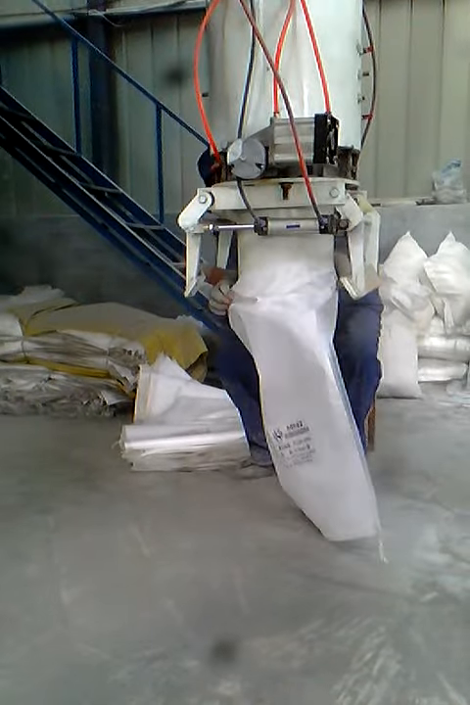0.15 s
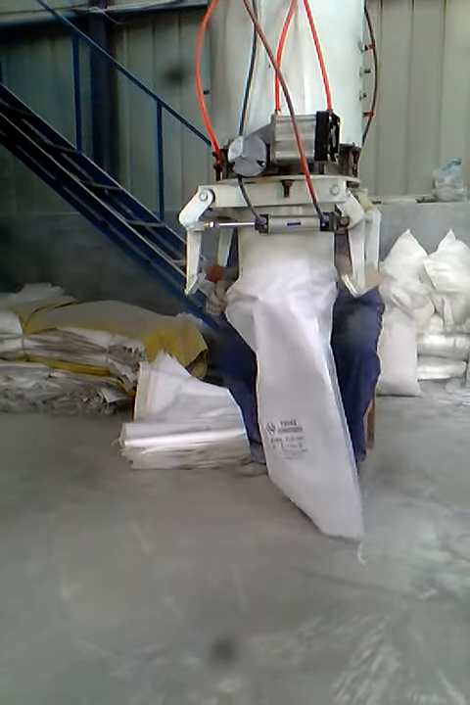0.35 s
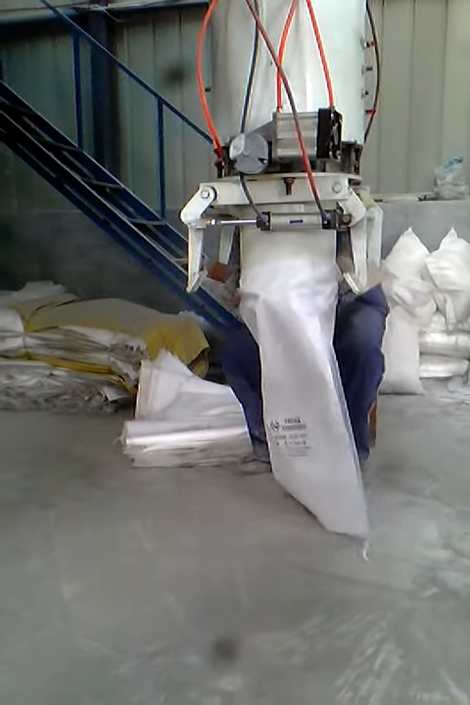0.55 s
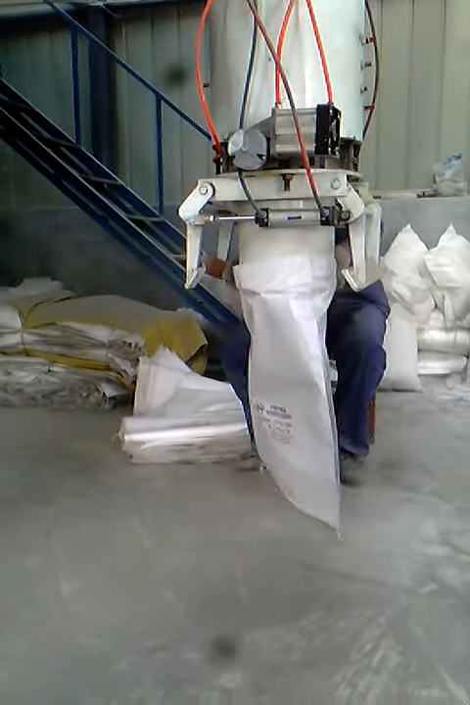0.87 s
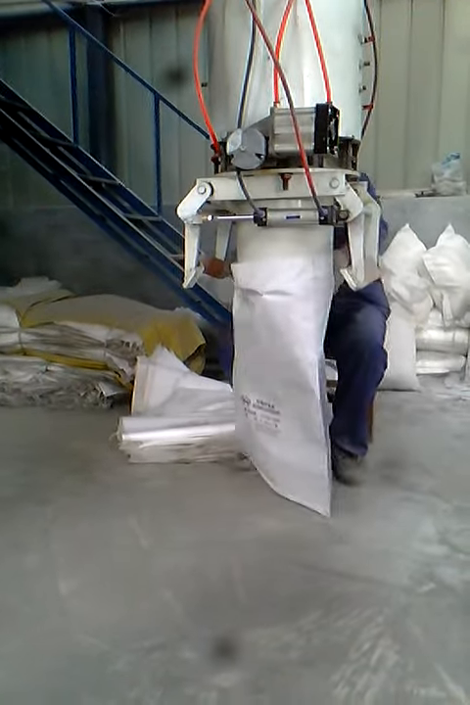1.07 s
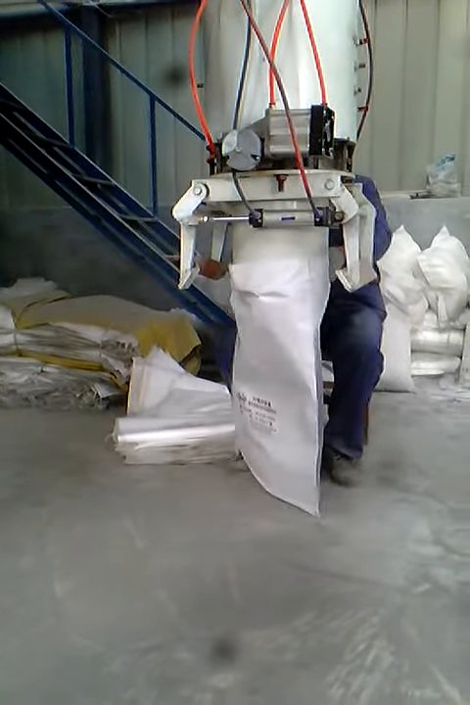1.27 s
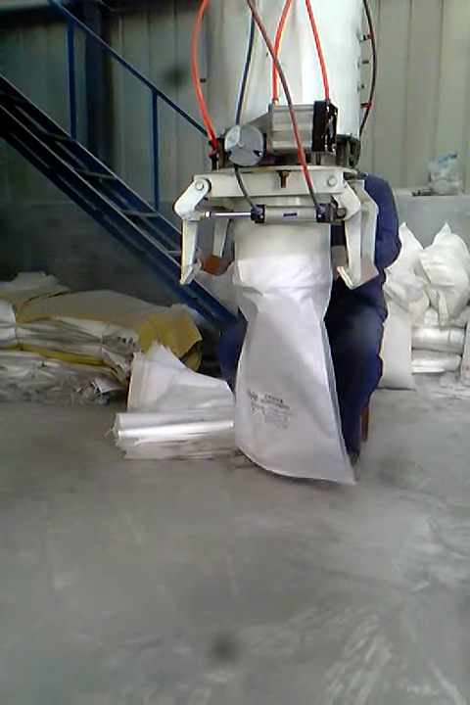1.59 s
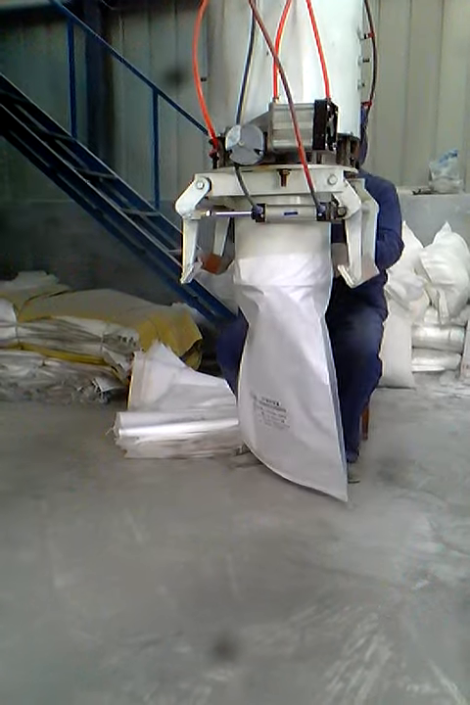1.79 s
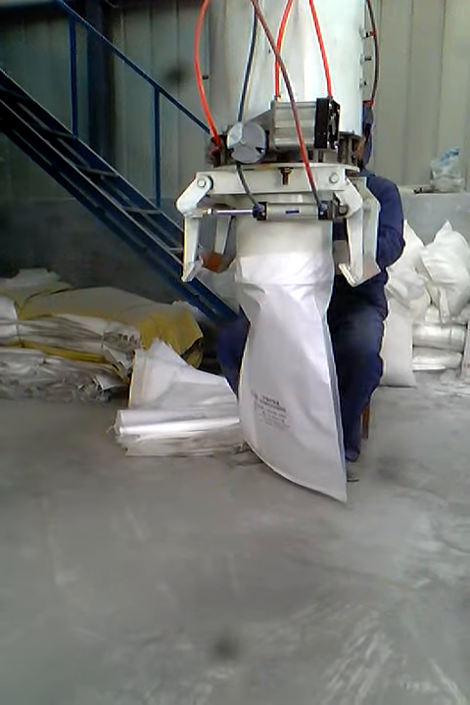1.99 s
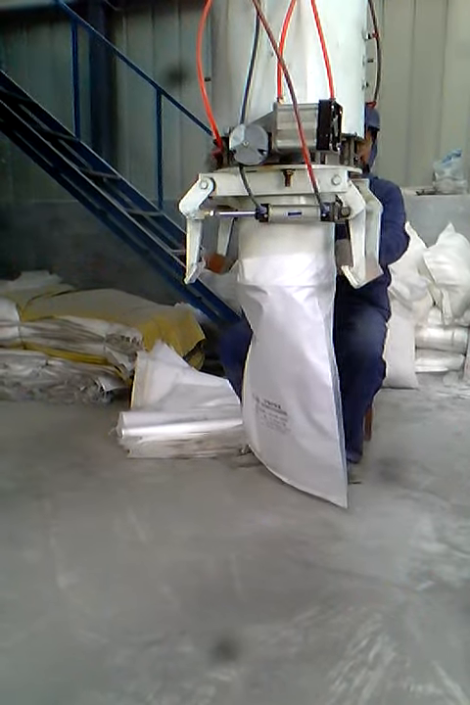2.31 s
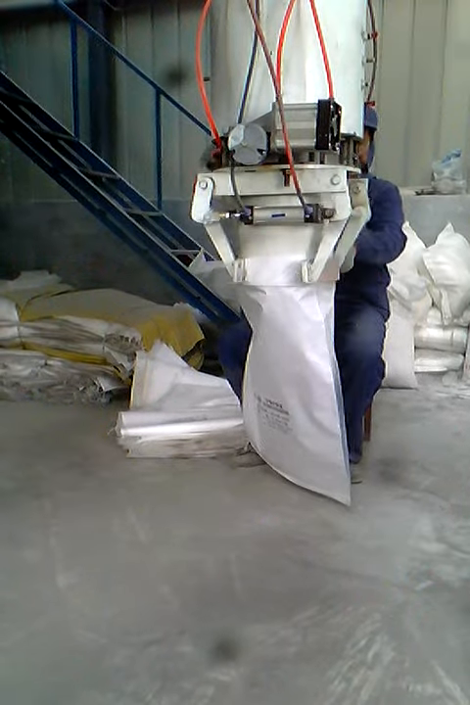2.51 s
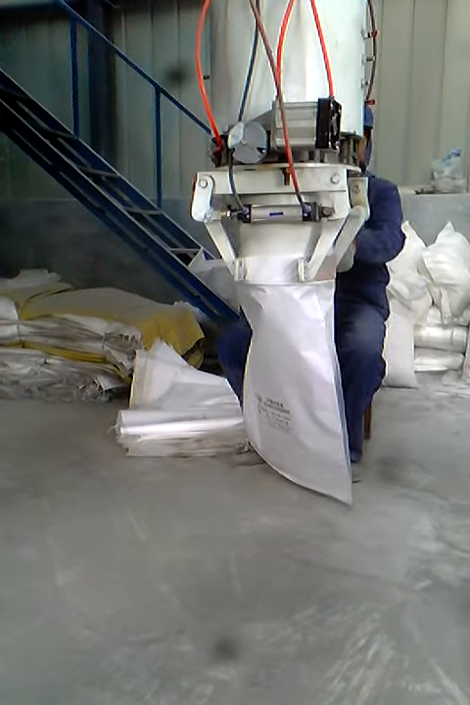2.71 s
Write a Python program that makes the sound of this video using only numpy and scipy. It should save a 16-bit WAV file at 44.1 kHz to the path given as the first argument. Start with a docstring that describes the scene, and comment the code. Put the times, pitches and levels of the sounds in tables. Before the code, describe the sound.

A pneumatic bag clamp closes at about 2.5 s. First, a packing machine idles quietly with steady rush, rapid knocking and ticking, about twenty cycles a second, and faint whining chirps. A woven plastic sack rustles and bumps at 0-0.4 s, softly again near 0.8, 1.7 and 2.15. A valve clacks at 2.3, air swells and bursts at 2.49 with clattering steel slam, hollow boom and short hall tail; squeaks, thin hiss and rustling follow until the end.

```python
"""A drive knocks and ticks about twenty times a second over a steady rush: a bag packing machine idles in a factory hall.
A woven plastic sack, made of grainy noise, rustles and bumps as it is pulled over the spout.
A valve clacks in ringing noise bands, compressed air bursts out as shaped noise, and clamp arms slam on the spout:
blows ring steel modes, with a short hall tail. The spout booms in sagging tones; the pivots squeak in rough tones.
All sources lie straight ahead, as on one microphone feeding both channels; no distances are set."""
import sys
import numpy as np
from scipy import signal
from scipy.fft import rfft, irfft
from scipy.io import wavfile

SR = 44100
rng = np.random.default_rng(int(sys.argv[2]) if len(sys.argv) > 2 else 0)


def store_pcm(level_fs):
    """Save levels as 16-bit WAV."""
    pcm = np.round(np.clip(level_fs, -1, 1) * 32767).astype(np.int16)
    wavfile.write(sys.argv[1], SR, np.atleast_2d(pcm).T)


N = 125685
T = np.arange(N) / SR  # time axis in seconds

# steady rush of the machinery: spectrum (f/Hz, relative level/dB)
RUSH_COLOUR = [(30, -33), (80, -22), (130, -7), (300, -2.5), (420, -6), (680, -6.5), (1000, 2), (1380, -6),
               (1560, -4.5), (2050, -1.5), (2900, -8.5), (6000, -12), (7200, -26.5)]
# strength of the rush over time (t/s, level/dB)
RUSH_LEVEL = [(0, -51), (.4, -52.5), (1.1, -52), (1.7, -53), (1.95, -55.5), (2.85, -53)]
# housing resonances that whine (f/Hz, width/Hz, level/dB)
WHINES = [(320, 21.6, -66), (1045, 17, -65), (1206, 16, -63), (1269, 30, -61.5), (1365, 42, -64)]
# brief chirps into which the whine swells (t/s, f/Hz, glide/(Hz per s), level/dB)
CHIRPS = [(.095, 1260, -1500, -52), (.215, 1277, 0, -52), (0.464, 1280, 503, -55), (.92, 1363, 302, -56),
          (1.045, 1208, 2399, -50.5), (1.66, 1230, 2400, -51)]
WHINE_WAVER_DB = 3
CHIRP_RISE_S, CHIRP_T60_S = 0.022, 0.25
TONE_WANDER_HZ, TONE_ROUGH_DB = 18, 2.5  # random spread of pitch and strength, chirps and squeaks alike

CYCLE_HZ = 19.865  # turns of the drive
# low knocks in each turn (t into the turn/s, level before housing and load/dB)
KNOCKS = [(.013, -52.5), (.0447, -52.5)]
# load on the drive: strength of the knocks over time (t/s, relative level/dB)
KNOCK_LOAD = [(0, -5.5), (.7, -1.5), (.85, 2), (1.25, 2), (1.5, -4.5), (1.9, -8), (2.85, -10)]
# modes of the drive housing, rung by each knock (f/Hz, relative level/dB, t60/s)
HOUSING_MODES = [(115.5, -3, 0.055), (171.6, -0.5, 0.068), (250, 3, 0.043), (325, -3.5, 0.049),
                 (810, -2, 0.027), (1242, -6, 0.038)]
KNOCK_SCATTER_DB, KNOCK_LOW_CUT_HZ = 3, 110
# bright ticks in each turn (t into the turn/s, level before the slow level changes/dB)
TICKS = [(0.024, -54.5), (0.0317, -48.5), (.0368, -56.5), (0.047, -52.5)]
# spectrum of the tick hiss (f/Hz, relative level/dB)
TICK_COLOUR = [(500, -23), (1200, 3), (1600, 7), (2100, -6), (3000, 2.5), (6200, 0), (7200, -7)]
TICK_SCATTER_DB, TICK_RISE_S, TICK_T60_S = 0.87, 0.00081, 0.037

# rubs of the sack (t/s, rise/s, t60/s, level/dB)
RUSTLES = [(.03, 0.068, 0.45, -49.5), (.125, 0.0081, 0.33, -45.5), (.232, 0.0063, 0.15, -48.5),
           (1.69, 0.017, 0.13, -50.5), (2.135, 0.0091, 0.12, -50.5), (2.19, 0.0082, 0.13, -52.5),
           (2.695, 0.013, 0.17, -41.5), (2.745, .01, 0.17, -44.5), (2.84, 0.0039, .15, -44)]
# spectrum of the woven plastic (f/Hz, relative level/dB)
SACK_COLOUR = [(300, -19), (800, -9), (1200, 5), (1550, -5), (2000, 10.5), (3000, -35), (4000, 8),
               (5400, -15), (6000, 10), (6300, 1), (6850, -3.5), (7250, 6.5), (8800, 10.5), (9300, -19)]
SACK_GRAIN_DB = 3
# dull bumps on the spout (t/s, rise/s, t60/s, level/dB)
BUMPS = [(0, 0.0041, 0.099, -43.5), (.282, 0.013, 0.2, -44), (.302, 0.0031, 0.11, -37),
         (.80, 0.0043, 0.14, -49), (.85, 0.013, 0.13, -49.5)]
# spectrum of the bumps (f/Hz, relative level/dB)
BUMP_COLOUR = [(40, -51), (120, -5.5), (230, 2), (390, 2.5), (560, -22), (1250, -5), (1550, -17),
               (2000, -3), (3000, -26), (7000, -25.5)]

# dry rubbing in the pivots (f/Hz, width/Hz, level before the envelope/dB)
RUBBING_BANDS = [(1150, 134, -44.5), (2080, 290, -56)]
# squeaks of the pivots (t/s, rise/s, t60/s, f/Hz, level/dB)
SQUEAKS = [(2.464, 0.015, 0.27, 1319, -34), (2.555, 0.01, 0.15, 1045, -37), (2.652, 0.015, 0.11, 1760, -46),
           (2.70, 0.019, 0.26, 1056, -40), (2.728, 0.017, 0.21, 1040, -36),
           (2.733, 0.012, 0.083, 1204, -38), (2.838, 0.007, .2, 1085, -44.5)]

# clacks of the valve as it seats (t/s, rise/s, t60/s, level before the ringing/dB)
VALVE_CLACKS = [(2.303, 0.0025, 0.14, -40.5), (2.317, 0.0034, 0.13, -47.5)]
# ringing bands of the valve (f/Hz, width/Hz, relative level/dB)
VALVE_BANDS = [(297, 39, -3), (708, 110, -9), (1920, 180, -1.5), (2401, 55, -4), (4005, 80, -13)]
# strength of the compressed air over time (t/s, level/dB)
AIR_LEVEL = [(2.29, -83), (2.322, -53), (2.35, -48), (2.387, -49), (2.4, -40), (2.44, -35), (2.484, -34.5),
             (2.49, -23), (2.505, -23), (2.565, -27), (2.585, -32.5), (2.615, -37), (2.68, -46.5),
             (2.85, -53.5)]
# spectrum of the air blast (f/Hz, relative level/dB)
AIR_COLOUR = [(200, -20.5), (800, -14), (1500, -7), (2050, 0), (2450, 1), (2900, -4.5), (3750, -4),
              (4700, 0.5), (5800, 1), (6700, 0), (7300, -6.5), (9000, -3.5)]
# steel parts that ring under the blast (f/Hz, width/Hz, level relative to the air/dB)
AIR_RINGS = [(2635, 36, -18), (3052, 39, -15.5), (3390, 28, -17), (3985, 85, -13), (5710, 30, -17.5),
             (6780, 25, -18.5)]
# thin hiss in which the air runs out (f/Hz, width/Hz, level before the envelope/dB)
LAST_HISS = [(3420, 35, -45), (5080, 46, -41), (5900, 90, -37), (6500, 160, -37.5)]
AIR_GRAIN_DB, AIR_LOW_CUT_HZ = 1.05, 83
# short groans of the piston as it sticks and slips (t/s, f/Hz, level/dB)
GROANS = [(2.397, 821, -42), (2.413, 535, -46), (2.428, 634, -48), (2.44, 830, -46.5)]
GROAN_RISE_S, GROAN_T60_S, GROAN_WIDTH_HZ = 0.003, 0.15, 44

# booms of the hollow spout (t/s, f at the start/Hz, level/dB)
BOOMS = [(2.489, 216.3, -32), (2.533, 256.3, -31.5), (2.56, 227, -31.5), (2.62, 220, -43)]
BOOM_RISE_S, BOOM_T60_S, BOOM_SAG_HZ_PER_S = 0.0075, 0.1, 410
# shudders of the spout (t/s, rise/s, t60/s, level/dB)
SHUDDERS = [(2.477, 0.021, 0.22, -34), (2.538, 0.0086, 0.32, -32)]
# spectrum of the shudders (f/Hz, relative level/dB)
SHUDDER_COLOUR = [(30, -31), (70, -10), (130, -0.5), (200, 0.5), (320, 0.5), (420, -11.5), (900, -12),
                  (3000, -51)]
# bands of the clatter in the frame (f/Hz, width/Hz, level before the envelope/dB)
FRAME_BANDS = [(636, 156, -28.5), (1490, 200, -24), (2200, 200, -27)]

# contacts as the clamp arms hit the spout and chatter (t/s, strength of the blow/dB)
SLAMS = [(2.4878, -15.5), (2.493, -12), (2.5022, -0.5), (2.5063, -6), (2.5088, -3), (2.5108, -9.5),
         (2.5179, -19), (2.523, -7.5), (2.532, -20)]
# modes of clamp and spout (f/Hz, relative level/dB, t60/s)
CLAMP_MODES = [(267.2, -29, 0.24), (638, -28, 0.067), (997, -28, 0.12), (1057, -35, 0.18),
               (1200, -35, 0.097), (1390, -31, 0.12), (1485, -26.5, 0.11), (1565, -25, 0.069),
               (1689, -30, 0.13), (1916, -28, 0.069), (1995, -29, 0.09), (2170, -34, 0.11),
               (2230, -35, 0.064)]
CRACK_HZ, CRACK_RISE_S, CRACK_T60_S, CRACK_DB = 1600, 0.0008, 0.0026, -4
SLAM_SCATTER_DB, SLAM_LOW_CUT_HZ = 1.5, 112
HALL_DELAY_S, HALL_RISE_S, HALL_T60_S, HALL_DB = 0.0042, 0.0033, 0.24, -11

TREBLE_EDGE_HZ, CUTOFF_HZ = 7350, 9750
TOP_HZ, TOP_DB = (8560, 9420), -15.5  # faint band of sizzle above the treble edge


def from_db(db):
    """Decibels to gain."""
    return 10 ** (np.asarray(db) / 20)


def rms_one(x):
    """Scale to rms 1."""
    return x / np.sqrt(np.mean(x ** 2) + 1e-20)


def level(rows):
    """Gain over time, straight in dB between (t/s, level/dB) points."""
    return from_db(np.interp(T, *np.transpose(rows)))


def noise(colour):
    """Noise of rms 1 with a spectrum drawn through (f/Hz, level/dB) points on a log frequency axis."""
    hz, db = np.transpose(colour)
    f = np.maximum(np.fft.rfftfreq(N, 1 / SR), 1)
    gain = from_db(np.interp(np.log(f), np.log(hz), db))
    return rms_one(irfft(rfft(rng.standard_normal(N)) * gain, N))


def resonance(hz, width_hz):
    """Noise of rms 1 in one steep-sided resonance."""
    f = np.fft.rfftfreq(N, 1 / SR)
    gain = 1 / (1 + ((f - hz) / width_hz) ** 2)
    return rms_one(irfft(rfft(rng.standard_normal(N)) * gain, N))


def resonances(bands):
    """Sum of noise resonances from (f/Hz, width/Hz, level/dB) rows."""
    return sum(from_db(db) * resonance(hz, width) for hz, width, db in bands)


def drift(rate_hz):
    """Random wander with spread 1, mostly slower than the given rate."""
    return resonance(0, rate_hz)


def swell(start, rise, t60):
    """Envelope: a straight rise, then an exponential fall; all times in s."""
    fall_time = np.maximum(T - start - rise, 0)
    return np.clip((T - start) / rise, 0, 1) * from_db(-60 * fall_time / t60)


def swells(rows):
    """Joint envelope of (t/s, rise/s, t60/s, level/dB) events, added as powers."""
    return np.sqrt(sum((from_db(db) * swell(s, rise, t60)) ** 2 for s, rise, t60, db in rows))


def clicks(times, gains):
    """Single-sample blows."""
    out = np.zeros(N)
    at = (np.asarray(times) * SR).astype(int)
    inside = (at >= 0) & (at < N)
    out[at[inside]] = gains[inside]
    return out


def through(x, response):
    """Play x through an impulse response."""
    return signal.fftconvolve(x, response)[:N]


def low_cut(x, hz):
    """Steep high-pass."""
    return signal.sosfilt(signal.butter(4, hz, "high", fs=SR, output="sos"), x)


def struck(times, db, modes, scatter_db):
    """Blows ring decaying sine modes, each blow and mode with a slightly different strength."""
    out = 0
    for k, (hz, mode_db, t60) in enumerate(modes):
        scatter = scatter_db * rng.standard_normal(len(times))
        blows = clicks(times, from_db(db + mode_db + scatter))
        ring = np.sin(2 * np.pi * hz * T) * from_db(-60 * T / t60)
        out = out + (-1) ** k * through(blows, ring)  # neighbouring modes have opposite signs
    return out


def tone(start, hz, glide_hz_per_s, wander_hz, rough_db):
    """A sine that glides from its starting pitch, with random wander in pitch and strength."""
    pitch = hz + glide_hz_per_s * (T - start) + wander_hz * drift(126)
    wave = np.sin(2 * np.pi * np.cumsum(pitch * (T > start)) / SR)
    return np.sqrt(2) * wave * rms_one(from_db(rough_db * drift(90)))


def machinery():
    """Steady rush of shaped noise, wavering housing resonances and brief gliding chirps."""
    out = noise(RUSH_COLOUR) * level(RUSH_LEVEL)
    for hz, width, db in WHINES:
        waver = from_db(WHINE_WAVER_DB * drift(8.5))
        out += from_db(db) * rms_one(resonance(hz, width) * waver)
    for s, hz, glide, db in CHIRPS:
        chirp = tone(s, hz, glide, TONE_WANDER_HZ, TONE_ROUGH_DB)
        out += from_db(db) * chirp * swell(s, CHIRP_RISE_S, CHIRP_T60_S)
    return out


def drive():
    """Each turn rings the housing with low knocks and adds ticks whose hiss is new every time."""
    turns = np.arange(0, N / SR, 1 / CYCLE_HZ)
    times, db = np.transpose([(turn + s, db) for turn in turns for s, db in KNOCKS])
    knocks = low_cut(struck(times, db, HOUSING_MODES, KNOCK_SCATTER_DB), KNOCK_LOW_CUT_HZ)
    taps = 0
    for s, db in TICKS:
        scatter = TICK_SCATTER_DB * rng.standard_normal(len(turns))
        taps = taps + clicks(turns + s, from_db(db + scatter))
    # overlapping ticks add as powers
    power = through(taps ** 2, swell(0, TICK_RISE_S, TICK_T60_S) ** 2)
    ticks = np.sqrt(np.abs(power)) * noise(TICK_COLOUR)
    # the ticks follow the slow level changes of the rush
    return knocks * level(KNOCK_LOAD) + ticks * rms_one(level(RUSH_LEVEL))


def sack():
    """Grainy rubbing of woven plastic and dull bumps on the spout, both enveloped noise."""
    grain = rms_one(from_db(SACK_GRAIN_DB * drift(170)))
    rustles = noise(SACK_COLOUR) * grain * swells(RUSTLES)
    return rustles + noise(BUMP_COLOUR) * swells(BUMPS)


def pivots():
    """Dry rubbing in noise bands, and short rough squeaks with a slightly unsteady pitch."""
    out = resonances(RUBBING_BANDS) * swell(2.506, rise=0.02, t60=4.1)
    for s, rise, t60, hz, db in SQUEAKS:
        squeak = tone(s, hz, 0, TONE_WANDER_HZ, TONE_ROUGH_DB)
        out += from_db(db) * squeak * swell(s, rise, t60)
    return out


def piston():
    """The piston sticks and slips in narrow-band groans, then scrapes as it slides."""
    out = resonance(2000, width_hz=330) * from_db(-42) * swell(2.5, rise=0.003, t60=0.8)  # scrape
    for s, hz, db in GROANS:
        out += from_db(db) * resonance(hz, GROAN_WIDTH_HZ) * swell(s, GROAN_RISE_S, GROAN_T60_S)
    return out


def pneumatics():
    """The valve clacks, the piston moves, and the air jet sets steel ringing and ends in a thin hiss."""
    valve = resonances(VALVE_BANDS) * swells(VALVE_CLACKS)
    jet = noise(AIR_COLOUR) * rms_one(from_db(AIR_GRAIN_DB * drift(200)))
    air = (jet + resonances(AIR_RINGS)) * level(AIR_LEVEL)
    hiss = resonances(LAST_HISS) * swell(2.587, rise=0.012, t60=0.27)
    return low_cut(valve + piston() + air + hiss, AIR_LOW_CUT_HZ)


def spout():
    """The hollow spout booms with a sagging pitch and shudders; its frame clatters as the arms close."""
    out = noise(SHUDDER_COLOUR) * swells(SHUDDERS)
    for s, hz, db in BOOMS:
        boom = tone(s, hz, -BOOM_SAG_HZ_PER_S, wander_hz=0, rough_db=0)
        out += from_db(db) * boom * swell(s, BOOM_RISE_S, BOOM_T60_S)
    return out + resonances(FRAME_BANDS) * swell(2.5015, rise=0.0026, t60=0.15)


def hall(x):
    """Reverberation: a decaying noise response of unit energy, starting after a short delay."""
    response = rng.standard_normal(N) * swell(HALL_DELAY_S, HALL_RISE_S, HALL_T60_S)
    return from_db(HALL_DB) * through(x, response / np.linalg.norm(response))


def clamp():
    """Each contact gives a short crack and rings the steel modes; the hall answers."""
    times, db = np.transpose(SLAMS)
    crack = np.sin(2 * np.pi * CRACK_HZ * T) * swell(0, CRACK_RISE_S, CRACK_T60_S)
    cracks = through(clicks(times, from_db(db)), from_db(CRACK_DB) * crack)
    ringing = struck(times, db, CLAMP_MODES, SLAM_SCATTER_DB)
    slams = low_cut(cracks + ringing, SLAM_LOW_CUT_HZ)
    return slams + hall(slams)


def scene():
    """Everything is heard from straight ahead, alike in both ears."""
    mono = machinery() + drive() + sack() + pivots() + pneumatics() + spout() + clamp()
    return np.array([mono, mono])


def record(dry):
    """The treble ends at a steep edge, with a faint band above it; the top is cut."""
    body = signal.sosfilt(signal.ellip(10, 0.3, 70, TREBLE_EDGE_HZ, fs=SR, output="sos"), dry)
    top = signal.sosfilt(signal.butter(6, TOP_HZ, "band", fs=SR, output="sos"), dry)
    cutoff = signal.ellip(10, 0.3, 80, CUTOFF_HZ, fs=SR, output="sos")
    return signal.sosfilt(cutoff, body + from_db(TOP_DB) * top)


dry = scene()
out = record(dry)
store_pcm(out)
```